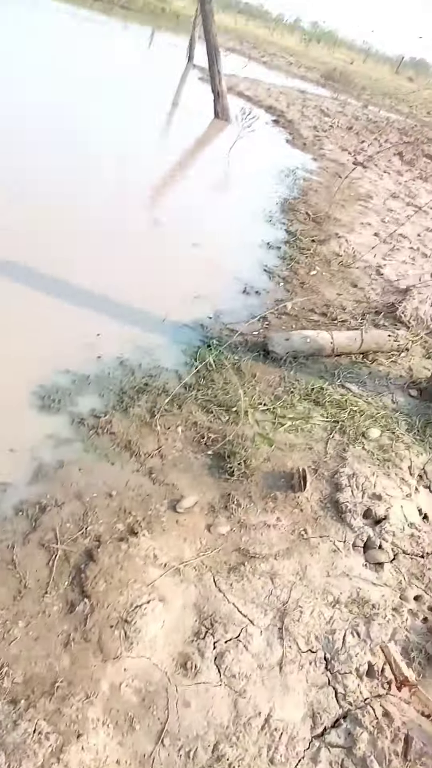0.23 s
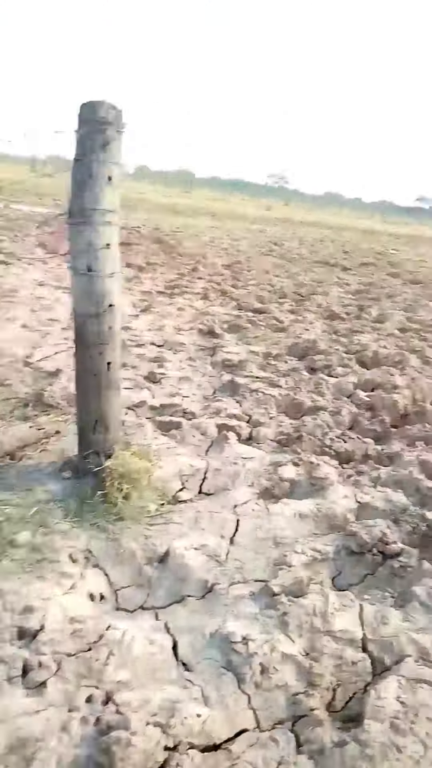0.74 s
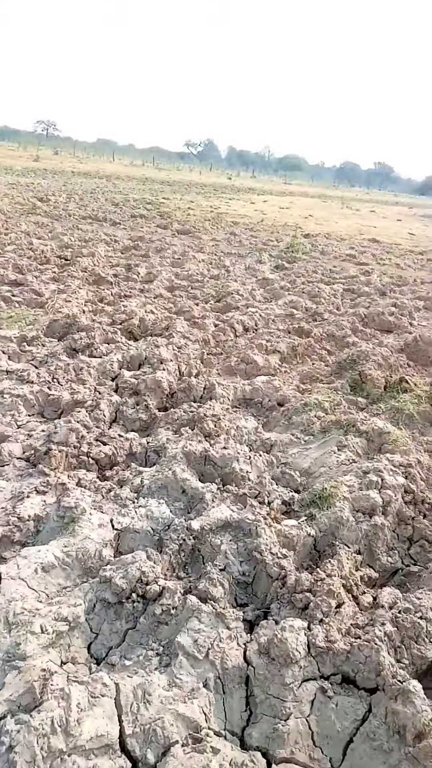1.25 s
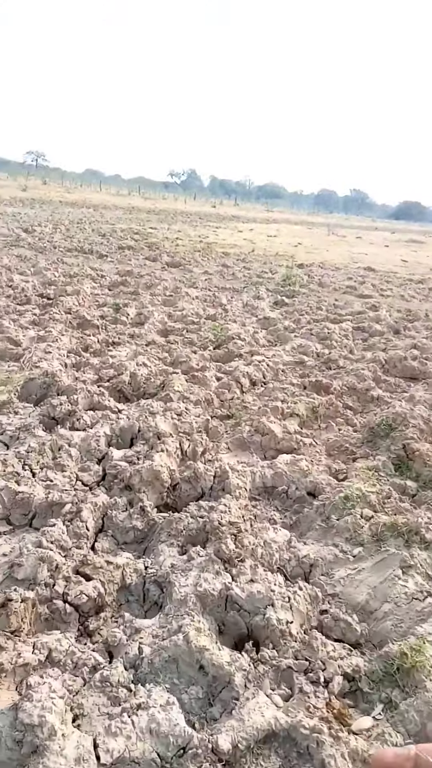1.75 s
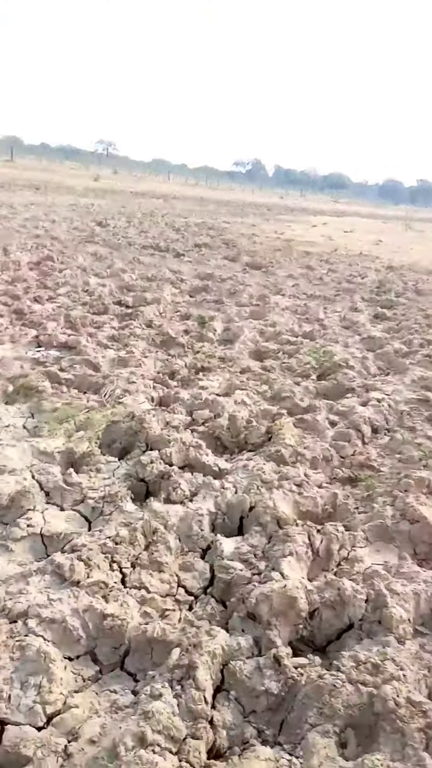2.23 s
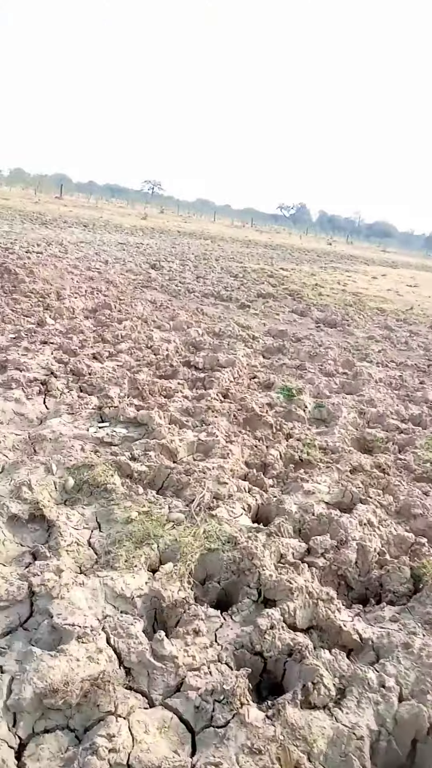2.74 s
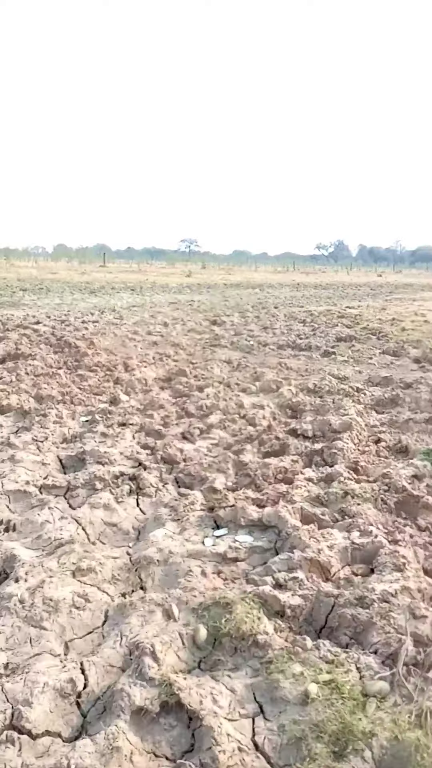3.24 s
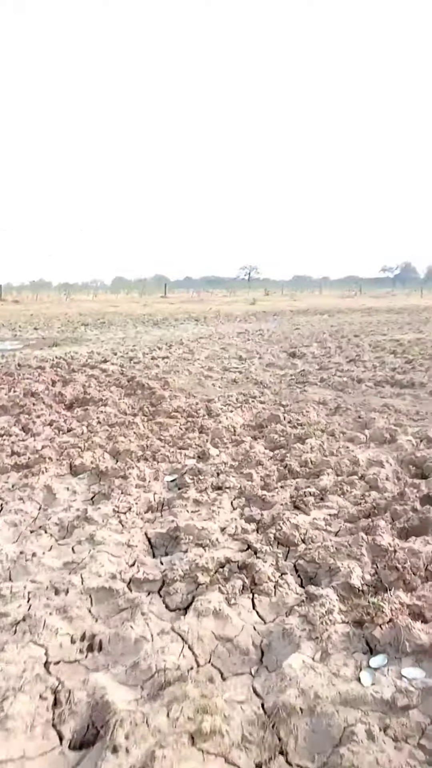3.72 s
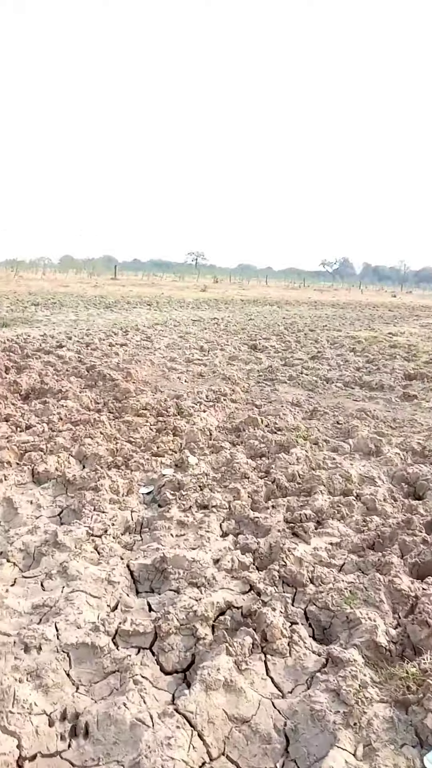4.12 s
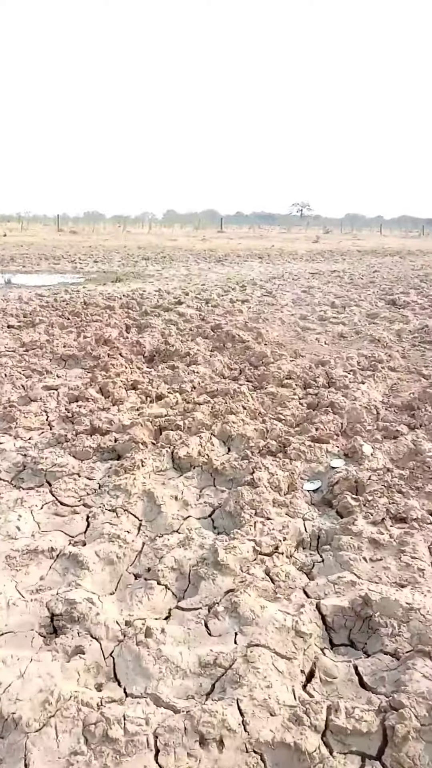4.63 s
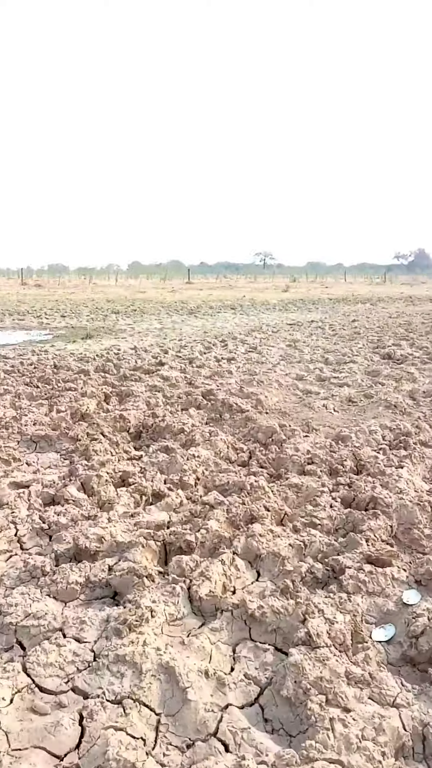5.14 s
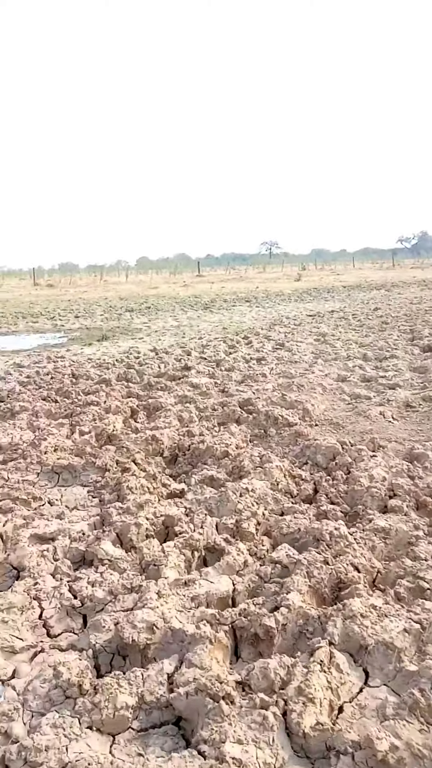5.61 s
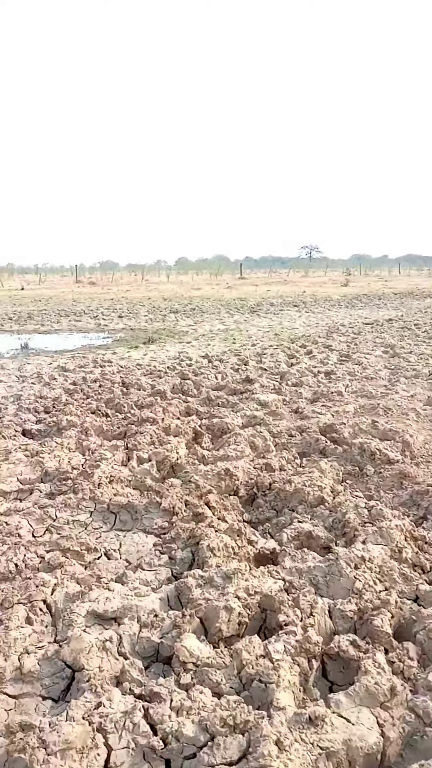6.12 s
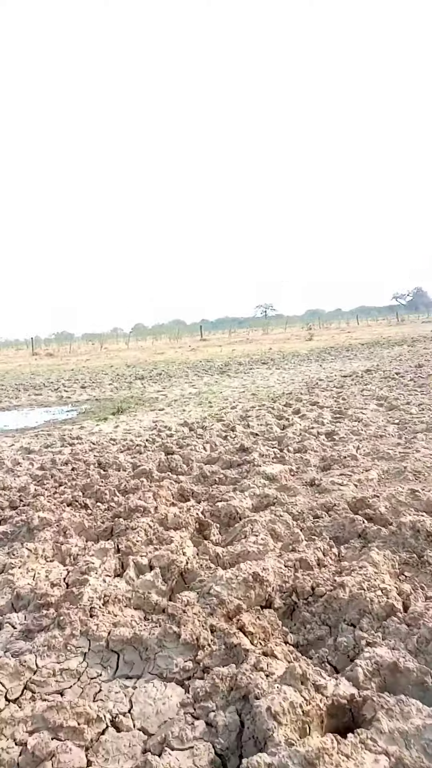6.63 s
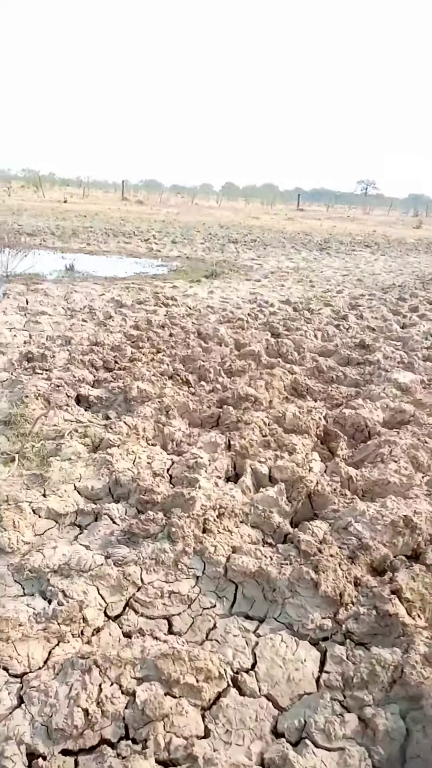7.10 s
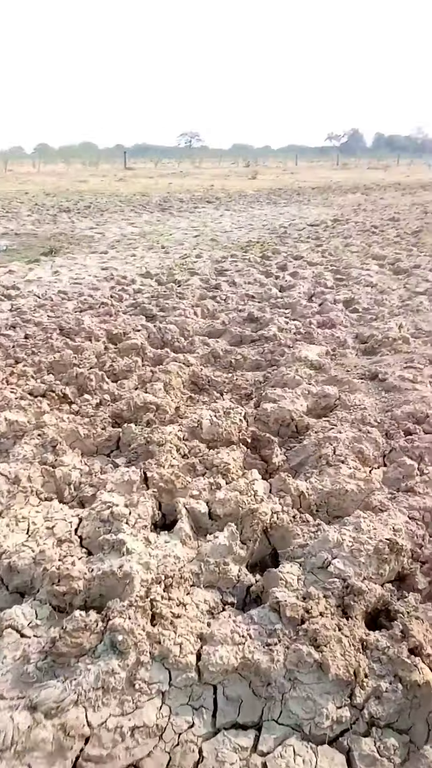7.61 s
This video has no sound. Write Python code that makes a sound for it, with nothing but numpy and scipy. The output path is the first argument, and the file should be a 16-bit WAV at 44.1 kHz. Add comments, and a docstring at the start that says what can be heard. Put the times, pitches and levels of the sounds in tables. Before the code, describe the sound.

Close, dry footsteps on cracked mud in open country. Each step is a cluster of gritty crunch, sinking thuds, hollow knocks of breaking clods and tiny sharp snaps. Quieter scuffs fill the gaps, and footfalls and light wind make a lumpy low rumble on the single handheld microphone. The last steps are the heaviest, with no echo.

```python
"""Footsteps crunch in dense grit over dry, cracked mud in open country.
Clods knock and thud with a falling pitch, and dry flakes snap; an uneven rumble from footfalls
and a light wind shakes the microphone. Crunch, grit and rumble are coloured random grains under
overlapping swells; thuds, knocks and crumbs are short sinking tones, snaps are noise bursts."""
import sys
import numpy as np
from scipy import signal
from scipy.fft import rfft, irfft
from scipy.io import wavfile
from scipy.ndimage import uniform_filter1d

SR = 44100
rng = np.random.default_rng(int(sys.argv[2]) if len(sys.argv) > 2 else 0)


def transcribe(u):
    """Save the signal u as a 16-bit wav file named by the first command-line argument.

    u: samples, shape (n,) or (channels, n), limited to [-1, 1]; the rate is SR.
    q: integer samples, one column per channel.
    """
    v = np.clip(np.atleast_2d(u).T, -1, 1)
    q = np.round(v * 32767).astype(np.int16)
    wavfile.write(sys.argv[1], SR, q)


N = 346563  # length in samples

# Blows of heel and clod on the ground. Each row: start in seconds, nominal peak in dB,
# nominal pitch in Hz, heavy bass in dB over that peak.
THUD_HITS = [(0.035, -36, 106, -13), (0.057, -24, 109, -20), (0.227, -25, 107, -16),
             (0.309, -21.5, 146, -24), (0.327, -21, 137, -17), (0.343, -19, 110, -8),
             (0.391, -15.5, 216, -18), (0.41, -30, 115, -13), (0.69, -36.5, 205, -29),
             (0.837, -32, 272, -21), (0.961, -21, 213, -9), (1.523, -19.5, 368, -7.5),
             (1.586, -14, 207, -14), (1.61, -20.5, 175, -12), (1.754, -21, 286, -9), (2.072, -17, 418, -17),
             (2.143, -24.5, 108, -11), (2.191, -22, 222, -15), (2.212, -23, 121, -17),
             (2.225, -17.5, 294, -20), (2.256, -28, 112, -6), (2.52, -28.5, 165, -15),
             (2.611, -22.5, 360, -22), (2.669, -22.5, 269, -30), (2.688, -26.5, 290, -23),
             (2.741, -40, 126, -9), (2.892, -32.5, 303, -3), (2.947, -33, 203, -18),
             (3.171, -26.5, 286, -30), (3.283, -14.5, 204, -6.5), (3.327, -22.5, 188, -24),
             (3.451, -27, 224, 3), (3.48, -32, 177, -5), (3.755, -34.5, 456, -21), (4.189, -43, 145, -16),
             (4.25, -27.5, 153, 2), (4.347, -24, 150, -19), (4.404, -30, 236, -25), (4.589, -16, 177, -24),
             (4.852, -28, 120, 2.5), (4.987, -23.5, 136, -4), (5.024, -18, 162, -7), (5.047, -23, 133, -8),
             (5.113, -12, 154, -20), (5.263, -32, 237, -8), (5.377, -32, 205, -5), (5.453, -18, 206, -21),
             (5.537, -16, 174, -13), (5.677, -22, 244, -7), (5.863, -34, 270, -15), (6.1, -31, 190, -15),
             (6.158, -28.5, 109, -14), (6.553, -30, 253, -26), (6.583, -25.5, 160, -13),
             (6.66, -12, 243, -7), (6.764, -21.5, 202, -10), (6.907, -9.5, 222, -8), (6.947, -28, 150, -17),
             (7.015, -29, 225, -23), (7.08, -21, 213, -16), (7.128, -18.5, 268, -26),
             (7.257, -19.5, 179, -23), (7.455, -29, 259, -4), (7.681, -19.5, 283, -26),
             (7.765, -22, 406, -16), (7.794, -16.5, 137, -2), (7.821, -9, 196, -25)]
# Clods that break. Each row: start in seconds, nominal peak in dB, nominal pitch in Hz,
# brittle crack in dB over that peak.
CLOD_BREAKS = [(0.061, -26, 532, -25), (0.111, -30, 685, -29), (0.25, -34, 824, -11),
               (0.328, -25, 625, -29), (0.393, -23.5, 664, 0), (1.046, -36, 715, -21),
               (1.066, -35.5, 830, -3), (1.457, -27.5, 503, -14), (1.527, -30, 600, -26),
               (1.581, -25.5, 567, 0), (1.658, -40, 544, -6), (1.721, -38, 710, -2), (1.741, -33, 660, -9),
               (2.049, -35, 530, -24), (2.073, -21, 486, -30), (2.08, -23.5, 505, -26),
               (2.111, -27, 870, -22), (2.179, -28.5, 520, -8), (2.221, -29, 620, -11),
               (2.488, -35, 655, -28), (2.606, -26.5, 760, -14), (2.649, -33, 690, 5.5),
               (3.282, -21, 506, -11), (3.429, -34, 840, -6), (3.754, -25, 475, -16),
               (4.183, -33.5, 580, -14), (4.222, -31.5, 696, -27), (4.455, -29.5, 536, -18),
               (4.587, -29, 490, -19), (4.739, -30.5, 560, -16.5), (4.886, -29, 550, -32),
               (4.991, -39, 725, 3), (5.024, -20.5, 756, -10), (5.091, -36, 540, -17),
               (5.108, -22, 597, -22), (5.416, -27.5, 587, -15), (5.541, -26.5, 1100, -13),
               (6.174, -35.5, 1140, -1), (6.644, -26, 580, -20), (6.702, -24.5, 520, -24),
               (6.767, -41, 1060, 4), (6.835, -38, 663, -12), (6.848, -27, 840, -4), (6.911, -19, 496, -36),
               (6.951, -25.5, 600, -14), (7.073, -23, 563, -29), (7.13, -24.5, 517, -23),
               (7.199, -23, 647, -31), (7.209, -25.5, 560, -25), (7.226, -28, 600, -29),
               (7.68, -21, 536, -14), (7.75, -24.5, 646, -12), (7.779, -18, 478, -9),
               (7.823, -29.5, 540, -1)]


def levels():
    """Crunch, grit, rumble and clods share overlapping swells; thuds jolt the rumble, knocks loosen clods."""
    # Overlapping swells of the crunch; several may form one scrape. Each row: peak in seconds,
    # crunch in dB, rise over 10 dB of crunch in ms, fade over 10 dB of crunch in ms,
    # fine grit in dB over crunch, rumble in dB over crunch.
    crunch_swells = [(0.009, -63.5, 65, 78, -13, 13), (0.101, -51, 88, 53, -18.5, 21.5),
                     (0.228, -53, 92, 106, -15, 10), (0.344, -46.5, 121, 101, -12, 2.5),
                     (0.421, -43.5, 105, 33, -10.5, 10.5), (0.564, -56.5, 62, 80, -15.5, 8.5),
                     (0.724, -60, 108, 110, -24, 6.5), (0.899, -45, 53, 79, -15, 2.5),
                     (0.96, -45.5, 37, 56, -19, 7), (1.048, -56, 62, 128, -14, 9),
                     (1.351, -57.5, 33, 118, -20, 13.5), (1.476, -54, 115, 90, -13, 12),
                     (1.656, -46, 145, 28, -15.5, 10), (1.756, -46, 52, 40, -16, 10.5),
                     (1.865, -57, 43, 24, -24, 14), (1.977, -55, 82, 66, -24, 11),
                     (2.109, -49, 83, 67, -15, 10.5), (2.227, -43, 66, 24, -15, 8),
                     (2.33, -42.5, 47, 51, -15, 3.5), (2.4, -51.5, 36, 61, -16.5, 3),
                     (2.475, -62, 50, 48, -14, 4), (2.565, -48, 81, 58, -16.5, 2),
                     (2.7, -42, 79, 14, -14, 6), (2.751, -49, 22, 34, -16, 14.5),
                     (2.868, -59.5, 160, 106, -22, 12.5), (3.013, -57.5, 129, 86, -18.5, 5.5),
                     (3.155, -48, 93, 55, -19, 3.5), (3.21, -48.5, 44, 45, -34, 8.5),
                     (3.255, -50, 35, 11, -18, 14.5), (3.294, -41, 25, 33, -15.5, 2.5),
                     (3.391, -43.5, 49, 28, -16, 7), (3.494, -47.5, 52, 63, -17, 3),
                     (3.712, -57.5, 106, 62, -20.5, 14.5), (3.836, -49.5, 81, 87, -17, 6),
                     (3.958, -47, 57, 94, -18, 6), (4.226, -50, 85, 110, -16.5, 8.5),
                     (4.323, -47.5, 95, 146, -17, 11), (4.52, -43.5, 91, 118, -15, 1),
                     (4.765, -48.5, 98, 78, -15.5, 8), (4.835, -47, 58, 44, -19.5, 7),
                     (4.936, -43.5, 56, 33, -15.5, 5), (4.999, -42.5, 18, 38, -15, 3.5),
                     (5.034, -44, 27, 15, -15.5, 14), (5.085, -51, 59, 46, -20, 13),
                     (5.184, -54, 27, 25, -23, 10), (5.314, -52.5, 88, 23, -17, 5),
                     (5.434, -47.5, 87, 100, -17.5, 7), (5.551, -44.5, 23, 24, -17.5, 14),
                     (5.649, -48, 55, 68, -16.5, 5), (5.706, -52, 69, 111, -20, 4.5),
                     (5.948, -47, 64, 44, -17.5, 5.5), (6.03, -49.5, 39, 79, -21, 9),
                     (6.222, -50.0, 140, 40, -21.5, 10), (6.352, -53.5, 74, 104, -27, 2.5),
                     (6.568, -47.5, 61, 132, -13.5, -11), (6.66, -47, 109, 124, -20, 3.5),
                     (6.779, -42.5, 39, 20, -15, 11.5), (6.849, -44.5, 43, 9, -14.5, 8.5),
                     (6.875, -50.5, 23, 47, -13, 1), (6.964, -50.5, 110, 83, -22.5, 5),
                     (7.078, -49.5, 89, 58, -15.5, 1), (7.13, -52.5, 58, 128, -26, 11),
                     (7.299, -49, 132, 157, -18.5, 8.5), (7.479, -53, 78, 223, -19, 2),
                     (7.709, -53.5, 83, 71, -15.5, 5), (7.794, -39.5, 44, 32, -14, 5),
                     (7.856, -39.5, 49, 60, -15, 3.5)]
    s, db, rise_ms, fall_ms, grit_db, rumble_db = np.transpose(crunch_swells)
    thud_s, thud_db = np.transpose(THUD_HITS)[:2]
    knock_s, knock_db = np.transpose(CLOD_BREAKS)[:2]
    onset_ms = 13.4  # rise over 10 dB of jolts and tumbles
    wind_db = -60.5  # steady wind on the microphone

    crunch = swells(s, db, rise_ms, fall_ms)
    grit = swells(s, db + grit_db, rise_ms, fall_ms, steepness=1.24)
    rumble = swells(s, db + rumble_db, rise_ms, fall_ms, steepness=0.62)
    rumble += undb(wind_db) ** 2
    rumble += swells(thud_s, thud_db - 21, onset_ms, 35)  # jolts left by thuds
    clods = swells(s, db + 3, rise_ms, fall_ms, steepness=0.65)
    clods += swells(knock_s, knock_db - 17.5, onset_ms, 24)  # clods loosened by knocks
    return [level_db(power) for power in (crunch, grit, rumble, clods)]


def swells(s, db, rise_ms, fall_ms, steepness=1):
    """Power of overlapping rounded swells, once a millisecond; steepness scales their slope in dB."""
    ms = np.arange(N * 1000 // SR + 2)[:, None]
    late = ms - 1000 * s
    away = np.maximum(late / np.maximum(fall_ms, 1), -late / np.maximum(rise_ms, 1))
    roundness = 1.356  # power of time in the dB slope
    return np.sum(10 ** (db / 10 - steepness * away ** roundness), axis=1)


def level_db(power):
    """Level in dB at every sample, from power once a millisecond."""
    db = 10 * np.log10(power + 1e-12)
    return np.interp(np.arange(N) * 1000 / SR, np.arange(len(power)), db)


def crust(crunch_db, grit_db):
    """Grains of three sizes break under the sole; all three surge together as the weight shifts."""
    # Colours of coarse crunch, fine grit and finest dust.
    # Each row: frequency in Hz, relative density in dB per Hz.
    crunch_colour = [(400, -44), (950, -3), (2150, -9), (3100, -13.5), (3700, -20.5), (4300, -25.5),
                     (5500, -53), (9000, -76)]
    grit_colour = [(2500, -28), (4500, 0), (6100, 0.5), (7000, -4), (8500, -23), (12000, -48.5)]
    dust_colour = [(6500, -48), (8000, 2.5), (10500, -1.5), (12500, -10), (14000, -7.5), (15200, 1.5),
                   (15900, -1.5), (16300, -41.5)]
    surge_db = 1.48 * walk(60.0)
    weight_db = crunch_db + surge_db
    fine_db = grit_db + surge_db + 1.6 * walk(70.0)

    crunch = colour(grains(3000.0, 1.61) * undb(weight_db - 0.5), crunch_colour)
    out = streaky(crunch, 2.95) + crumbs(weight_db)
    grit = colour(grains(9000.0, 2.46) * undb(fine_db - 0.1), grit_colour)
    out += streaky(grit, 4.0)
    # the finest dust falls away faster than the grit, so it favours the loudest moments
    dust_db = 1.226 * fine_db + 0.75 * walk(25.0) - 1.5
    dust = colour(grains(7000.0, 1.9) * undb(dust_db), dust_colour)
    return out + streaky(dust, 3.5)


def crumbs(weight_db, rate=220.0, low_hz=888.3, octaves=2.196, cycles=8.4, tilt_db=6.5):
    """Small hard lumps, rate per second, ring briefly at their own pitch, tilt_db fainter per octave up."""
    draws = rng.random((int(rate * N / SR), 3))
    wobbles = rng.standard_normal((len(draws), 2, 2))
    blows = []
    for (when, pitch, size), chance in zip(draws, wobbles):
        up = octaves * pitch
        db = weight_db[int(when * N)] - tilt_db * up - 3.07 * np.log(1 - .9 * size)
        blows.append(blow(when * N / SR, db, low_hz * 2 ** up, cycles, chance, 0.93, 0.029))
    return place(blows)


def thuds():
    """Heel and clod meet the ground; the weight of the body follows late and low."""
    heel, body = rng.standard_normal((2, len(THUD_HITS), 2, 32))
    hits = [blow(s, db - 2.0, hz, 2.63, chance, 0.655, 0.323)
            for (s, db, hz, _), chance in zip(THUD_HITS, heel)]
    lows = [blow(s + 0.0057, db + bass_db - 0.5, 59.0, 1.33, chance, 0.88, 0.28)
            for (s, db, _, bass_db), chance in zip(THUD_HITS, body)]
    return place(hits + lows)


def knocks():
    """Short hollow cracks of breaking clods, each with a brittle edge higher up."""
    hollow, edge = rng.standard_normal((2, len(CLOD_BREAKS), 2, 32))
    rings = [blow(s, db - 3.5, hz, 4.56, chance, 0.781, 0.17)
             for (s, db, hz, _), chance in zip(CLOD_BREAKS, hollow)]
    cracks = [blow(s, db + crack_db - 4.0, 1573.0, 7.6, chance, 0.85, 0.13)
              for (s, db, _, crack_db), chance in zip(CLOD_BREAKS, edge)]
    return place(rings + cracks)


def snaps():
    """Dry flakes crack in a millisecond or two of noise, with a separately levelled top octave."""
    # Each row: start in seconds, nominal peak in dB, nominal top octave in dB over that peak.
    flakes = [(0.11, -25.5, -34), (0.1725, -43, -29), (0.329, -12.5, -23), (0.393, -12, -24.5),
              (1.0647, -36, -39), (0.2992, -38, -30), (0.4314, -32, -30), (1.3798, -41, -35),
              (1.4426, -49, -35), (1.5822, -22, -18), (1.5964, -46, -18), (1.63, -31.5, -44),
              (1.7183, -37, -22), (2.155, -30, -42), (2.169, -46, -35), (2.195, -37, -28),
              (2.2222, -32, -6), (2.995, -36, -30), (3.2245, -41, -36), (3.2922, -26, -37),
              (3.7524, -42, -36), (3.845, -46, -36), (4.0, -43, -36), (4.4622, -43, -28), (4.589, -41, -31),
              (5.024, -20, -34), (5.5418, -32, -32), (5.393, -36, -31), (5.64, -31, -23), (5.736, -45, -28),
              (6.095, -49, -33), (6.1746, -27, -20), (6.215, -36, -29), (5.95, -42, -30), (6.661, -37, -22),
              (6.85, -43, -22), (6.914, -41, -22), (7.1994, -40, -36), (7.7765, -35, -11),
              (7.787, -22, -13), (7.819, -43.5, -22), (7.841, -24, -37)]
    # Colours of the crack's body and its top. Each row: frequency in Hz, relative density in dB per Hz.
    body_colour = [(500, 12.5), (2000, 4), (3000, -2), (4200, -8), (5900, 2.5), (7500, -15.5),
                   (10000, -21.5), (12500, -45)]
    top_colour = [(7000, -32), (9000, -17), (10800, -8.5), (12600, -12.5), (15000, -2), (16300, -4)]
    mid, top = np.zeros(N + SR), np.zeros(N + SR)
    noise = rng.standard_normal((len(flakes), 512))
    for (s, db, top_db), burst in zip(flakes, noise):
        u = np.arange(len(burst)) / SR * 1000 / 2.02  # time in units of 2.02 ms
        crack = burst * u / 0.33 * np.exp(1 - u / 0.25) * undb(db - 5.0)
        at = int(s * SR)
        mid[at:at + len(u)] += crack
        top[at:at + len(u)] += crack * undb(top_db + 4.5)
    return colour(mid[:N], body_colour) + colour(top[:N], top_colour)


def shake(rumble_db, clods_db):
    """Lumpy low rumble, and small clods that tumble with it."""
    # Colours of rumble and tumbling clods. Each row: frequency in Hz, relative density in dB per Hz.
    rumble_colour = [(15, -60.5), (30, -21.5), (42, -7.5), (60, 2.5), (130, -4), (230, -3), (330, -8),
                     (600, -54.5), (2500, -88.5)]
    clods_colour = [(100, -54), (330, 5), (690, 3), (900, -1), (1300, -48), (4000, -90.5)]
    lumps_db = 1.86 * walk(25.0)
    low = colour(grains(300.0, 2.17) * undb(rumble_db + lumps_db), rumble_colour)
    tumble_db = clods_db + 0.15 * lumps_db + 0.49 * walk(40.0)
    return low + colour(grains(1200.0, 2.05) * undb(tumble_db), clods_colour)


def blow(s, db, hz, cycles, chance, fall, rough):
    """One blow on loose earth: a few uneven cycles whose pitch sinks as the contact spreads."""
    turns = np.arange(int(3 * cycles / hz * SR)) * hz / SR
    u = turns / cycles
    # random pitch steps and sizes, glided through every half nominal cycle; the last one holds
    step, size = (np.interp(2 * turns, np.arange(len(c)), c) for c in chance)
    pitch = 1.21 * hz * fall ** np.minimum(u, 1.5) * np.exp(rough * step)
    shape = u / 0.42 * np.exp(1 - u / 0.33) * undb(db + 1.9 * size)
    wave = np.sin(2 * np.pi * np.cumsum(pitch) / SR)
    return int(s * SR), shape * np.sign(step[0]) * wave  # random polarity


def place(blows):
    """Sum of sounds at their start samples."""
    out = np.zeros(N + SR)
    for at, sound in blows:
        out[at:at + len(sound)] += sound
    return out[:N]


def grains(rate, scatter_db):
    """Random tiny breaks, rate per second on average, many small and a few large; rms 1."""
    chance = rng.random((3, N))
    size = undb(-scatter_db * np.log(1 - chance[1])) * np.sign(chance[2] - .5)
    x = (chance[0] < rate / SR) * size
    return x / np.sqrt(np.mean(x ** 2))


def streaky(x, spread_db, size=512, frames=10, bins=2):
    """Narrow bands swell and fade at random for some 30 ms, an uneven, streaky grain."""
    overlap = size * 3 // 4
    z = signal.stft(x, nperseg=size, noverlap=overlap)[2]
    field = uniform_filter1d(rng.standard_normal(z.shape), frames, axis=1)
    field = uniform_filter1d(field, bins, axis=0)
    gain = undb(spread_db * field / np.std(field))
    return signal.istft(z * gain, nperseg=size, noverlap=overlap)[1][:N]


def walk(rate):
    """Random levels held 1 / rate s and slewed twice; spread 1."""
    k = int(SR / rate)
    held = np.repeat(rng.standard_normal(N // k + 1), k)
    w = uniform_filter1d(uniform_filter1d(held, k), k)[:N]
    return w / np.std(w)


def colour(x, spectrum, size=8192):
    """Causal filter with the given spectrum, folded from the cepstrum of its log gain; unit power gain."""
    hz, db = np.transpose(spectrum)
    grid = np.log(np.arange(size // 2 + 1) * SR / size + 1)
    cep = irfft(np.interp(grid, np.log(hz), db) * np.log(10) / 20)
    # fold the second half onto the first: minimum phase
    cep[1:size // 2] *= 2
    cep[size // 2 + 1:] = 0
    response = irfft(np.exp(rfft(cep)))
    return signal.fftconvolve(x, response / np.sqrt(np.sum(response ** 2)))[:N]


def undb(db):
    """Gain of a dB value."""
    return 10 ** (np.asarray(db) / 20)


def scene():
    """Everything that reaches the single microphone."""
    crunch_db, grit_db, rumble_db, clods_db = levels()
    ground = crust(crunch_db, grit_db) + shake(rumble_db, clods_db)
    return (ground + thuds() + knocks() + snaps())[None]


def record(dry):
    """The microphone drops the deepest bass and adds a faint hiss; the top is cut."""
    # Colour of the hiss. Each row: frequency in Hz, relative density in dB per Hz.
    hiss_colour = [(3000, -24), (7000, -7), (12000, -8), (15000, -7), (15900, -5), (16200, -30)]
    hiss = colour(rng.standard_normal(N), hiss_colour) * undb(-89)
    bass_cut = signal.butter(4, 33.0, "high", fs=SR, output="sos")
    top_cut = signal.ellip(10, .2, 80, 16200, fs=SR, output="sos")
    heard = signal.sosfilt(bass_cut, dry) + hiss
    return signal.sosfilt(top_cut, heard)


dry = scene()
out = record(dry)
transcribe(out)
```